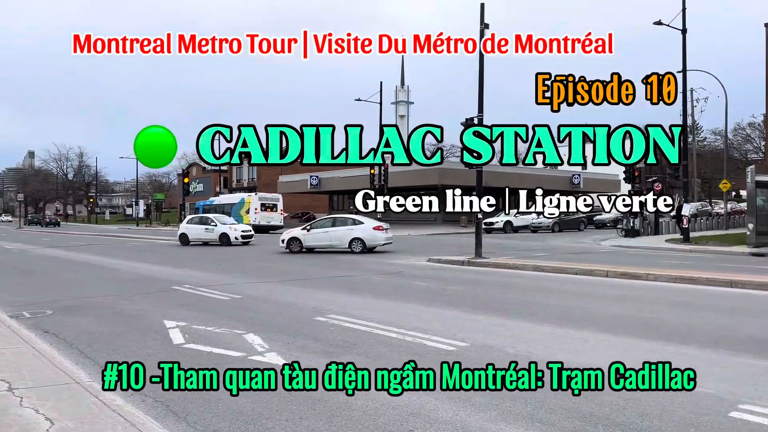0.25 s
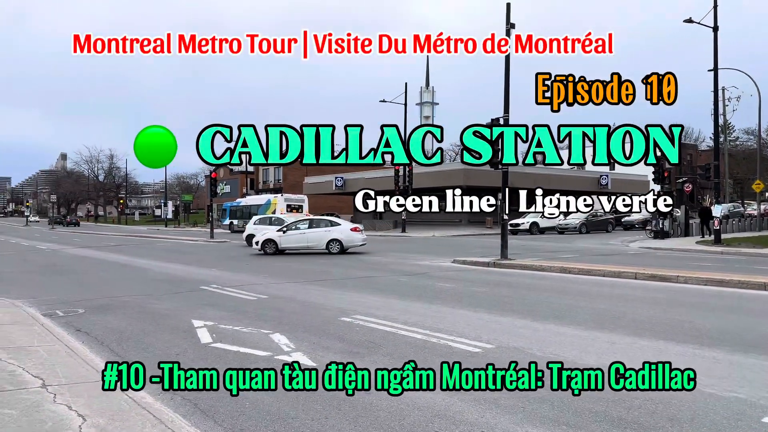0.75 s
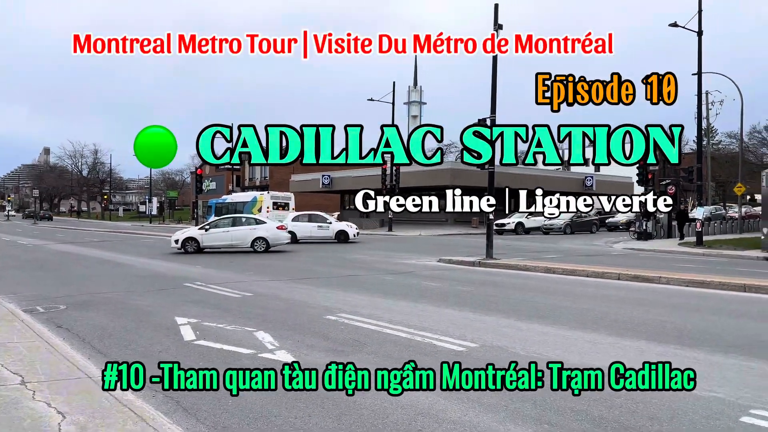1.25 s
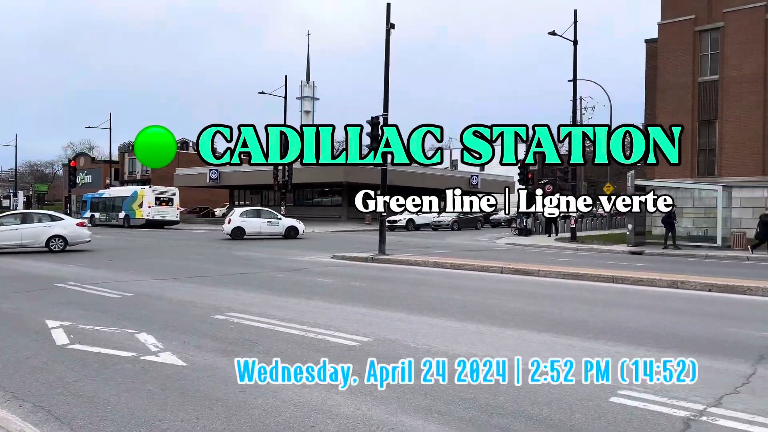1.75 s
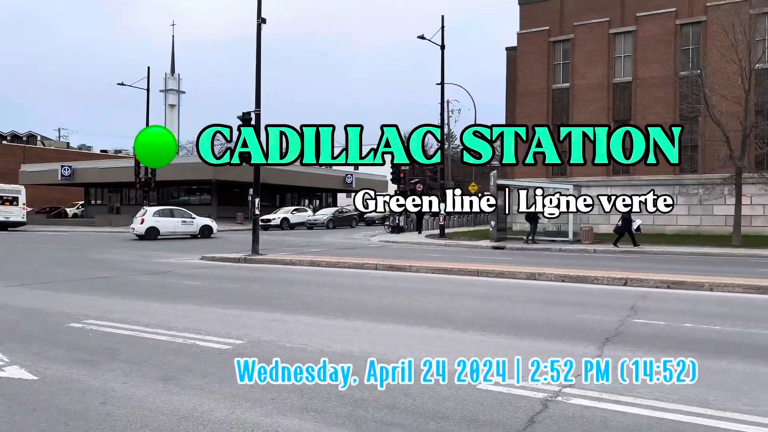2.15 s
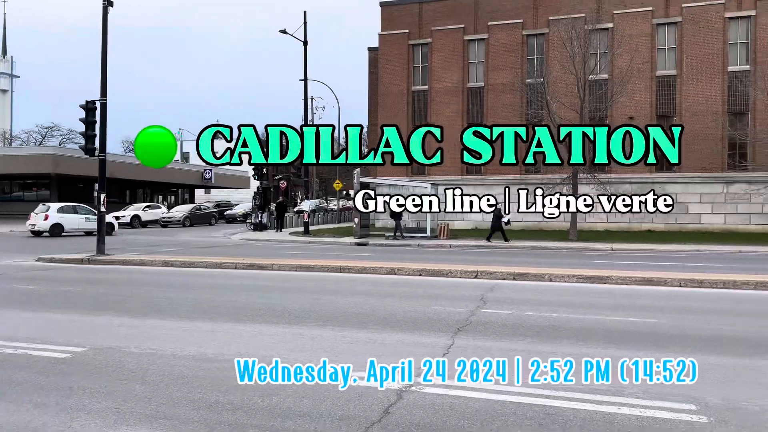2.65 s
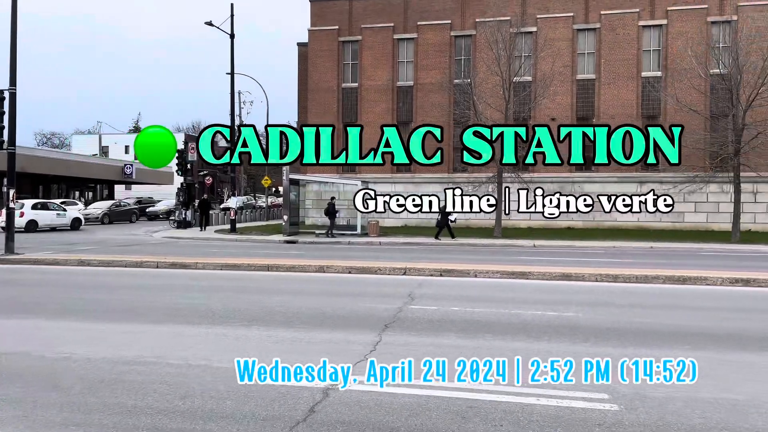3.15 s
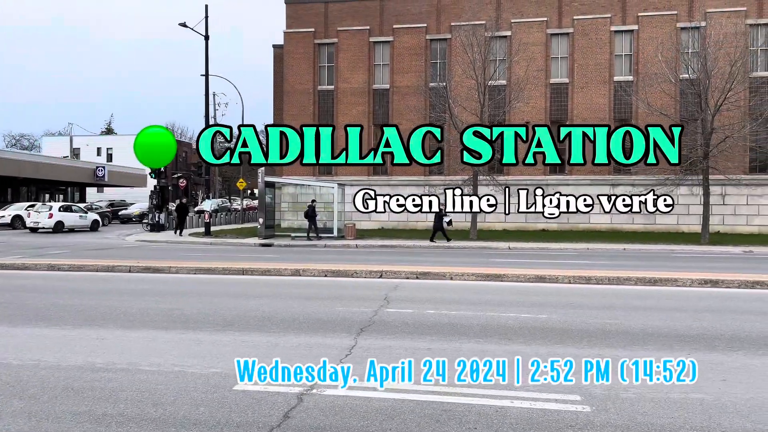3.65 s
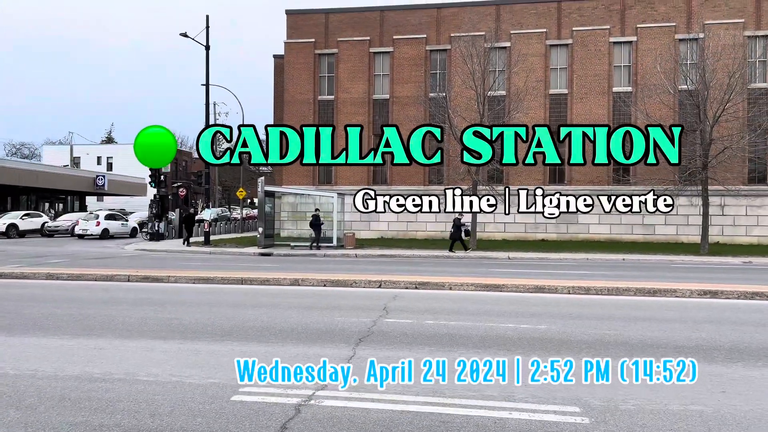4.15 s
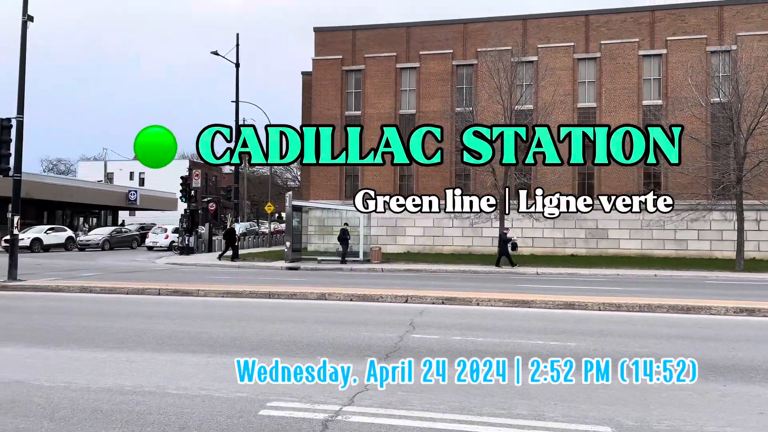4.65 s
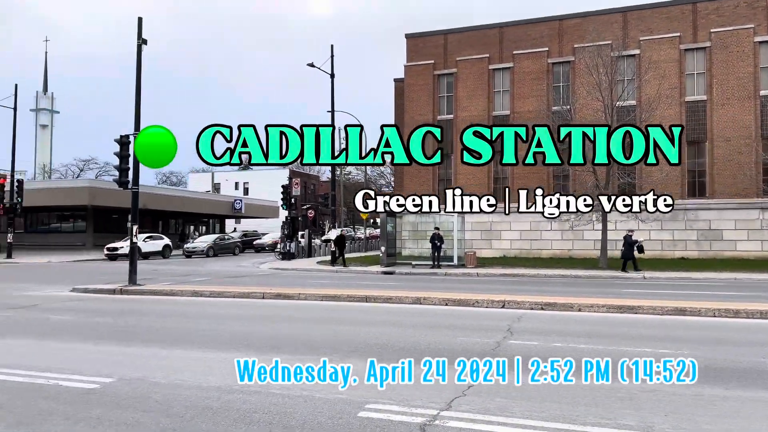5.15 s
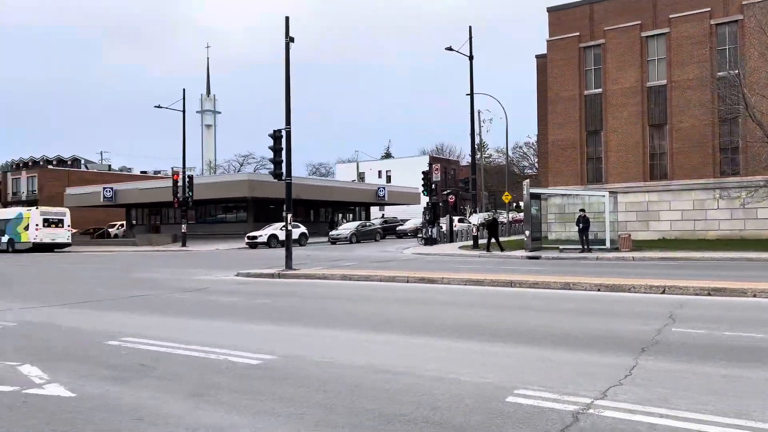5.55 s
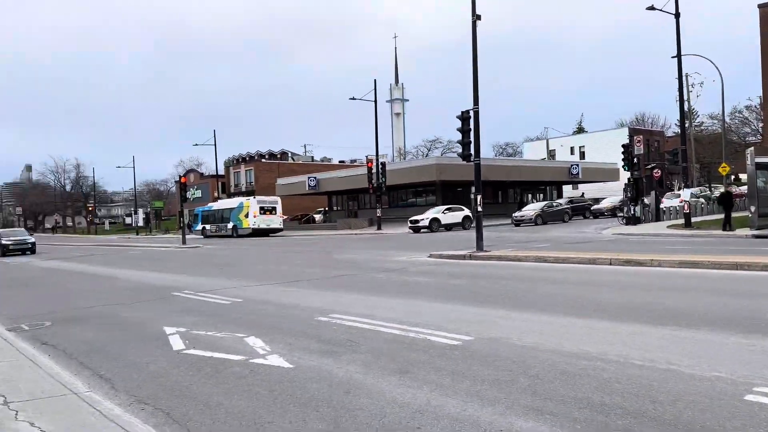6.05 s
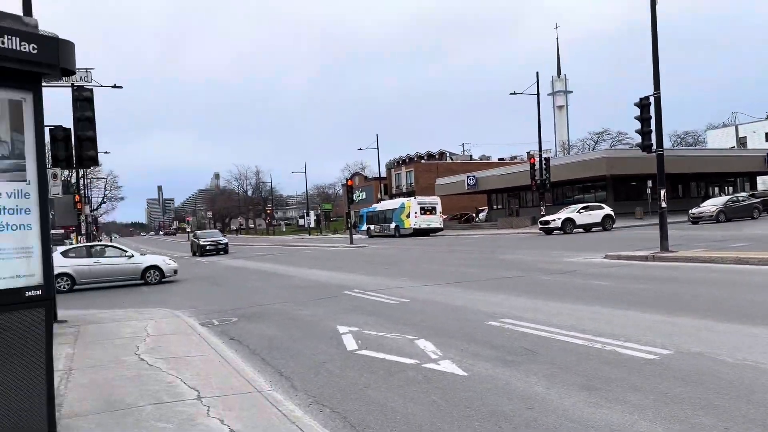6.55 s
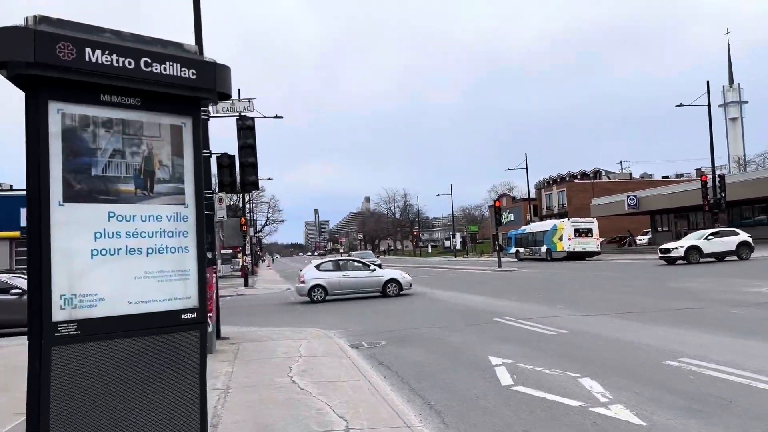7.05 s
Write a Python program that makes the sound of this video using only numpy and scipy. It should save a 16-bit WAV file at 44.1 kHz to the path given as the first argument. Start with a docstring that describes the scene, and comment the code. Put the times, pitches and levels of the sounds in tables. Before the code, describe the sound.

A wide city intersection heard outdoors from the sidewalk, in close stereo. At 0 s a near car is already leaving, its broad tyre roar and airy hiss falling away over engine rumble that is strongest early on. From about 0.5 to 1.3 s, short low wind thumps buffet the microphone; another car leaves near 1.25 s and sharp little clicks land around 1.3 s. From 1.5 s a bus idles as a deep, wavering hum. Distant cars wash past around 2, 2.6, 3.2, 4.2 and 4.9 s, with brief engine booms just after 3 s and sparse faint ticks. Dull knocks with a click come near 5.3 s. From 5.4 s thin brake chirps and very high, faint squeals appear with flickering fizz. Cars turn in near 6.45 s and cross around 7 s, while a fine, rapid rattle swells at 6.9 s and fades by the 7.3 s end.

```python
"""A city intersection heard from the sidewalk through two microphone openings set close together.
Filtered noise makes the avenue's engines and tyres, and the cars that leave, turn in and cross; hiss and fizz lie above.
Wavering sine waves make the idling bus, booming engines, singing treads and thin brake squeals, most of them late.
Short bursts of noise make the early gusts on the microphone, a few ticks, and a fine rattle near the end.
"""
import sys
import numpy as np
from scipy import signal
from scipy.fft import rfft, irfft
from scipy.io import wavfile
from scipy.ndimage import uniform_filter1d

SR = 44100
rng = np.random.default_rng(int(sys.argv[2]) if len(sys.argv) > 2 else 0)


def pcm_store(signal):
    """Save signal as 16-bit PCM."""
    levels = np.round(np.clip(np.atleast_2d(signal), -1, 1) * 32767)
    wavfile.write(sys.argv[1], SR, levels.astype(np.int16).T)


N = 321489  # samples, about 7.3 s

# Noise colours. Each noise is later scaled as a whole, so only the differences in dB count.
# Tyre roar of the avenue: pitch_hz, relative_level_db (per Hz)
AVENUE_ROAR = [(250, 1), (380, -2.5), (500, -1.5), (650, -3), (820, -6), (1020, 2), (1300, -1.5),
               (1780, -16.5), (2100, -13), (2500, -19.5), (3100, -26), (4000, -30), (5500, -31.5),
               (7000, -41), (9000, -42.5), (13000, -100)]
# Brighter rush of the tyre treads: pitch_hz, relative_level_db (per Hz)
TREAD_RUSH = [(900, -30), (1300, 5.5), (1750, 6.5), (2100, -2), (2500, -5.5), (3100, -16), (4500, -59)]
# Engine rumble: pitch_hz, relative_level_db (per Hz)
ENGINE_RUMBLE = [(20, -32.5), (28, -15), (40, -14.5), (55, -7.5), (68, -1.5), (87, -8.5), (114, -5),
                 (165, -8.5), (259, -6.5), (350, -11), (440, -16), (600, -27), (1000, -92)]
# Airy hiss of the near cars: pitch_hz, relative_level_db (per Hz)
CAR_HISS = [(2200, -4), (3300, 3.5), (4200, 3), (5500, 3), (6500, 0.5), (7500, -15), (11000, -79.5)]
# High fizz, also the colour of the rattle: pitch_hz, relative_level_db (per Hz)
FIZZ_COLOUR = [(5500, -16), (7300, -5), (8300, 0), (9400, -2), (10200, -11), (11000, -5), (11600, -4),
               (12300, -26), (16000, -38)]
# Tyre noise of the cars on each route: pitch_hz, relative_level_db (per Hz)
LEAVING_TYRES = [(100, -9.5), (300, 7), (450, 0), (650, -1), (920, 5.5), (1150, 3.5), (1650, -2.5),
                 (2050, -10.5), (2500, -10.5), (3200, -17.5), (4500, -21), (6800, -37), (8300, -27.5),
                 (9400, -41), (10500, -61), (15000, -81)]
TURNING_TYRES = [(100, 2.5), (200, 2.5), (330, -2.5), (600, -0.5), (850, -1), (1200, -4), (1700, -9),
                 (2300, -13), (3200, -20.5), (4500, -25), (7000, -46), (11000, -74.5), (14000, -60)]
CROSSING_TYRES = [(80, 9), (195, 12.5), (300, -2.5), (420, 0.5), (560, 7.5), (730, 0), (950, -0.5),
                  (1250, -3), (1650, -6), (2200, -12), (3200, -17.5), (4500, -24.5), (7000, -36),
                  (9500, -58), (11300, -44), (12500, -62)]

# How the avenue reaches the two ports: pitch_hz, likeness (0 to 1), left_lead_radians, left_minus_right_db
AVENUE_PORTS = [(100, 0.99, -0.0, -0.0), (350, 0.74, -0.8, 0.5), (530, 0.34, -2.4, 3.3),
                (750, 0.68, -3.3, -0.7), (1030, 0.92, -3.1, -1.1), (1350, 0.9, -3.8, -1.5),
                (1800, 0.8, -4.5, -2.6), (2150, 0.82, -5.8, -2.8), (2700, 0.67, -6.2, -1.3),
                (3500, 0.43, -9.5, 0.8), (4300, 0.26, -12.3, 0.7), (6000, 0.14, -12.3, 4.9),
                (9000, 0.28, -12.3, -2.6)]
# Cars far down the avenue: nearest_s, roar_db, fade_s (until the roar is 3 dB down), tread_rush_db
DISTANT_CARS = [(.7, -31.5, 0.64, -40.5), (2.05, -33.5, 0.39, -44.5), (2.62, -41, 0.43, -42),
                (3.15, -37.5, 0.1, -52), (4.249, -37, 0.53, -45.5), (4.85, -39, 0.69, -46),
                (5.28, -38.5, 0.41, -49)]
# Cars at the intersection: nearest_s, roar_db, fade_s (until the roar is 3 dB down), hiss_db, route
CLOSE_CARS = [(.07, -29, 0.206, -51.5, "leaving"), (1.25, -36.5, 0.36, -51.5, "leaving"),
              (3.5, -43, 1.05, -78, "turning"), (6.45, -39, 0.47, -62.5, "turning"),
              (7.05, -34, 0.52, -57, "crossing")]
# Level of the high fizz, before its flutter: time_s, level_db
FIZZ_LEVEL = [(0, -68), (.65, -81), (.88, -78), (1.08, -67.5), (1.55, -70.5), (1.8, -74), (2.1, -79),
              (2.45, -86), (3.4, -77), (3.7, -84), (4.05, -81.5), (5.2, -81), (5.5, -70), (5.95, -67.5),
              (6.62, -67.5), (6.9, -60), (7.29, -64)]
# Idling bus, before its wavering: time_s, firing_rate_hz, level_db
BUS_IDLE = [(1.5, 59.9, -35), (5.13, 59.86, -31.5), (5.45, 61.3, -36.5), (7.2, 59.9, -31.5)]
# Gusts on the microphone: start_s, length_s, level_db, centre_hz
GUST_LIST = [(0.48, 0.066, -16, 76.5), (0.552, 0.043, -21, 62), (0.59, 0.088, -21.5, 64),
             (0.654, 0.056, -23, 62), (0.741, 0.05, -25, 72), (0.793, 0.044, -23.5, 113),
             (.852, 0.047, -17.5, 119), (.975, 0.042, -18.5, 89.5), (1.006, 0.065, -14.5, 83),
             (1.12, 0.126, -28.5, 80.5), (1.148, 0.036, -21, 133), (1.242, 0.046, -18.5, 71),
             (1.287, 0.038, -16.5, 79.5)]
# Small ticks and knocks, with peak levels before panning: start_s, body_db, centre_hz, spread_octaves,
# left_minus_right_db, crack_db, decay_s (the burst dies by a factor e in half this time)
TICK_LIST = [(1.029, -52, 5000, .6, 7, -39, 0.0014), (1.3233, -24, 3200, .17, 6, -33.5, 0.00088),
             (1.3354, -33, 3240, 0.17, 6, -32, 0.0026), (2.329, -44, 5500, .42, 4, -47, 0.0033),
             (3.478, -50, 8500, .4, -2, -56, .002), (3.6195, -36, 6300, 0.068, 4, -52, 0.001),
             (4.1005, -50, 9000, 0.17, 0, -50, .001), (4.1018, -25.5, 1010, 0.59, -10, -53, 0.002),
             (5.022, -45, 5000, .6, 0, -48, 0.0011), (5.29, -18, 333, 0.7, 3, -48, 0.0025),
             (5.3184, -24, 1500, 0.43, -6, -39, 0.0021), (5.323, -25, 1500, 0.31, -3, -31.5, 0.002)]
# Resonances of the metallic crack in every tick: pitch_hz, spread_octaves, relative_level_db
CRACK_MODES = [(1400, .25, 3), (3620, 0.12, 4.5), (5400, 0.15, -1), (8500, 0.078, -3.5),
               (11500, 0.048, -20)]
# Brake squeals and chirps, before a shared lift in level: start_s, length_s, starting_pitch_hz, level_db,
# left_minus_right_db, pitch_jitter_hz
SQUEAL_LIST = [(1.652, .038, 5500, -54, 4, 130), (4.785, .12, 3880, -63, 0, 170),
               (4.79, .05, 5050, -66, 2, 170), (5.408, .025, 4180, -57, 3, 70),
               (5.451, .016, 4380, -51, 3, 70), (5.451, .015, 5880, -63, 4, 50),
               (5.451, .015, 6680, -63, 4, 50), (5.82, .065, 6080, -65, 6, 130),
               (6.235, .04, 5900, -65, 4, 130), (6.10, .24, 9515, -52, 0, 8), (6.32, .13, 9560, -53, 0, 10),
               (6.43, .11, 9470, -64, 0, 30), (6.25, .3, 7190, -74, 0, 30), (6.67, .13, 8385, -63.5, 0, 16),
               (6.81, .22, 8380, -61.5, 0, 16), (7.03, .16, 8400, -66, 0, 18),
               (6.85, .42, 11350, -69, 0, 25)]
# Notes sung by tyre treads: start_s, length_s, pitch_hz, level_db
TREAD_NOTE_LIST = [(2.901, 0.17, 1136, -56), (4.8, 0.13, 970, -55)]
# Engine notes that stand out of the rumble: start_s, length_s, pitch_hz, level_db
DRONE_LIST = [(3.102, 0.16, 269.5, -34.5), (3.15, 0.18, 121.7, -36.5), (3.499, 0.24, 123, -38),
              (4.4, 2, 199.3, -50.5)]
# Peak level of the fine rattle, before its scatter: time_s, level_db
RATTLE_LEVEL = [(6.7, -60), (6.8, -48), (6.92, -40), (7.29, -52)]

RUMBLE_DB, PULL_AWAY_DB, PULL_AWAY_S = -31.5, 4, 1.47  # steady rumble; extra while cars pull away; how long
TREBLE_FALL = 2.1  # hiss falls with distance this many times as steeply as roar, in dB
HISS_REACH = 2.17  # time scale of a car's hiss, as a multiple of its fade time
HISS_FLOOR_DB = -78  # hiss left between cars
SIDE_LAG_MS = 0.416  # delay between the ports for a sound from the side
SQUEAL_RISE_PER_S = 0.025  # share of its pitch that a squeal gains per second
RATTLE_HZ, RATTLE_SCATTER_DB = 31, 2.0  # ticks per second, and how much their strength varies

HOP = 512  # samples between noise frames, each four hops long
HZ = np.fft.rfftfreq(4 * HOP, 1 / SR)
FRAME_S = np.arange(N // HOP + 5)[:, None] * HOP / SR
TIME = np.arange(N) / SR


def gain_of(db):
    """Turns decibels into amplitude."""
    return 10 ** (np.asarray(db) / 20)


def evened(x):
    """Scales a signal to unit rms, its average strength."""
    return x / np.sqrt(np.mean(abs(x) ** 2) + 1e-20)


def along(rows, s):
    """Reads every column of a time curve at the times s."""
    at, *columns = np.transpose(rows)
    return [np.interp(s, at, column) for column in columns]


def across(rows):
    """Reads every column of a spectrum at the frequencies HZ, on a log pitch axis."""
    pitch_hz, *columns = np.transpose(rows)
    return [np.interp(np.log(HZ + 1), np.log(pitch_hz + 1), column) for column in columns]


def sides(balance_db):
    """Gives left and right gains that keep the total power constant."""
    ratio = gain_of(balance_db)
    return np.array([ratio, np.ones_like(balance_db)]) * np.sqrt(2 / (1 + ratio ** 2))


def add(mix, s, sound):
    """Mixes a stereo sound in at time s, cutting it off at the end of the mix."""
    part = mix[:, round(s * SR):][:, :sound.shape[1]]
    part += sound[:, :part.shape[1]]


def waver(rate_hz):
    """Makes a smooth random curve of unit rms that moves mostly slower than the rate."""
    f = np.fft.rfftfreq(N, 1 / SR)
    slow_part = np.exp(-(f / rate_hz) ** 2) * (f > 0)
    return evened(irfft(rfft(rng.standard_normal(N)) * slow_part, N))


def hump(f, centre_hz, octaves):
    """Shapes a bell-shaped band; octaves is its standard deviation."""
    return np.exp(-.5 * (np.log2((f + 1) / centre_hz) / octaves) ** 2)


def wash(spectrum, likeness, balance_db, patchy_db):
    """Stereo noise of unit rms with drifting patches; the complex likeness ties the two ports together."""
    a, b, c, d, patches = rng.standard_normal((5, len(FRAME_S), len(HZ)))
    patches = uniform_filter1d(patches, size=7, axis=0)  # smooth over time
    patches = evened(uniform_filter1d(patches, size=6, axis=1))  # then over frequency
    left = a + 1j * b
    own_share = np.sqrt(np.maximum(1 - abs(likeness) ** 2, 0))
    right = np.conj(likeness) * left + own_share * (c + 1j * d)
    colour = gain_of(across(spectrum)[0] + patchy_db * patches)
    frames = np.array([left, right]) * sides(balance_db + 0 * HZ)[:, None] * colour
    _, noise = signal.istft(frames.swapaxes(1, 2), nperseg=4 * HOP, noverlap=3 * HOP)
    return evened(noise[:, :N])


def passing(s, db, fade_s, fall):
    """Power of a vehicle on a straight lane, nearest at s; fall 1 is the inverse square of its distance."""
    return gain_of(db) ** 2 / (1 + ((TIME - s) / fade_s) ** 2) ** fall


def tone(length, hz, wobble_hz, flutter_db, lead, wobble_rate_hz=73):
    """An unsteady tone of unit rms that swells and fades; the left port leads by some radians."""
    phase = 2 * np.pi * np.cumsum(hz + wobble_hz * waver(wobble_rate_hz)) / SR
    note = np.sin([phase + lead, phase]) * gain_of(flutter_db * waver(35))
    note = note[:, :int(length * SR)]
    return evened(note * signal.windows.tukey(note.shape[1], .4))


def snap(colour, decay_s):
    """A coloured stereo burst of unit peak that rises from zero and quickly dies."""
    t = np.arange(4 * HOP) / SR
    noise = irfft(rfft(rng.standard_normal((2, len(t)))) * colour)
    burst = noise * t * np.exp(-2 * t / decay_s)
    return burst / abs(burst).max()


def avenue():
    """Engines, tyre roar and brighter tread rush are noises that swell as far cars pass, off to the right."""
    same, lead, balance_db = across(AVENUE_PORTS)
    likeness = np.clip(same, 0, 1) * np.exp(1j * lead)
    effort_db = RUMBLE_DB + PULL_AWAY_DB * np.exp(-(TIME / PULL_AWAY_S) ** 2)
    engines = wash(ENGINE_RUMBLE, likeness, balance_db, patchy_db=0.6) * gain_of(effort_db)
    roar_power = sum(passing(s, db, fade_s, 1.0) for s, db, fade_s, _ in DISTANT_CARS)
    rush_power = sum(passing(s, db, fade_s, 1.63) for s, _, fade_s, db in DISTANT_CARS)
    roar = wash(AVENUE_ROAR, likeness, balance_db, patchy_db=2.5) * np.sqrt(roar_power)
    rush = wash(TREAD_RUSH, likeness, balance_db, patchy_db=2.0) * np.sqrt(rush_power)
    return engines + roar + rush


def car(spectrum, route, ahead_s, sweep_s, direct, shade_db, port_gap_ms=0.98):
    """Tyre noise moves from left towards right, straight ahead at ahead_s; echoes are alike only in the bass."""
    khz, share = HZ / 10 ** 3, np.clip(direct, 0, 1)
    lag_ms = SIDE_LAG_MS * np.tanh((FRAME_S - ahead_s) / sweep_s)  # left port's delay behind the right
    straight = share * np.exp(-2j * np.pi * khz * lag_ms)
    echoes = (1 - share) * np.sinc(2 * khz * port_gap_ms)
    balance_db = shade_db * hump(HZ, 870, 0.86)  # negative: weaker on the left
    noise = wash(spectrum, straight + echoes, balance_db, patchy_db=3.0)
    power = sum(passing(s, db, fade_s, 1) for s, db, fade_s, _, way in CLOSE_CARS if way == route)
    return noise * np.sqrt(power)


def hiss(flutter_db=1.6):
    """Each near car brings an airy hiss on the left; above it runs a high, flickering fizz."""
    air_power = gain_of(HISS_FLOOR_DB) ** 2
    for s, _, fade_s, hiss_db, _ in CLOSE_CARS:
        air_power = air_power + passing(s, hiss_db, fade_s * HISS_REACH, TREBLE_FALL)
    air = wash(CAR_HISS, 0.1, 9.2 * hump(HZ, 5100, 0.73), patchy_db=3.5)
    fizz = wash(FIZZ_COLOUR, .6 * np.exp(1.2j), -1, patchy_db=1.5)
    fizz_db = along(FIZZ_LEVEL, TIME)[0] + flutter_db * waver(60)
    return air * np.sqrt(air_power) + fizz * gain_of(fizz_db)


def idling_bus(first_db=-1.5, second_db=-14, third_db=-19):
    """Diesel firing note with two overtones, each wavering on its way over the street."""
    hz, level_db = along(BUS_IDLE, TIME)
    turns = np.cumsum(hz + 0.75 * waver(6.4)) / SR  # firing cycles so far
    note = 0
    for k, db in enumerate([first_db, second_db, third_db], 1):
        strength = gain_of(db + 2.0 * waver(7.4))
        note = note + strength * np.sin(2 * np.pi * (k * turns + rng.random()))
    return np.sqrt(2) * gain_of(level_db) * note


def gusts(octaves=0.39, apart=0.18, lumpiness=0.78, skirt=0.12, skirt_ratio=2.04):
    """Each eddy gives the microphone a short low shove with a weaker flutter above, nearly alike at both ports."""
    out, f = np.zeros((2, N)), np.fft.rfftfreq(SR, 1 / SR)
    for s, length, db, hz in GUST_LIST:
        colour = hump(f, hz, octaves) + skirt * hump(f, hz * skirt_ratio, octaves)
        swirl = signal.hilbert(irfft(rfft(rng.standard_normal((2, SR))) * colour))
        strength = uniform_filter1d(abs(swirl), size=400)
        # lumpiness 1 keeps the natural ups and downs, 0 flattens them
        levelled = swirl.real * strength ** (np.clip(lumpiness, 0, 1) - 1)
        shared, own = levelled[:, :int(length * SR)]
        eddy = np.array([shared + apart * own, shared - apart * own])
        eddy = eddy * signal.windows.tukey(len(own), .4)
        add(out, s, gain_of(db) * evened(eddy))
    return out


def ticks():
    """Small hard contacts: each has a body of its own colour and decay under the same metallic crack."""
    out = np.zeros((2, N))
    metal = sum(gain_of(db) * hump(HZ, hz, octaves) for hz, octaves, db in CRACK_MODES)
    for s, db, hz, octaves, pan_db, crack_db, decay_s in TICK_LIST:
        body = gain_of(db) * snap(hump(HZ, hz, octaves), decay_s)
        crack = gain_of(crack_db) * snap(metal, decay_s)
        add(out, s, sides(pan_db)[:, None] * (body + crack))
    return out


def brakes(level_db=0.5):
    """Brake discs sing in single modes, each a jittery tone creeping up in pitch as the pads press."""
    out = np.zeros((2, N))
    for s, length, hz, db, pan_db, jitter_hz in SQUEAL_LIST:
        pitch = hz * (1 + SQUEAL_RISE_PER_S * TIME)  # time counts from the start of the squeal
        squeal = tone(length, pitch, jitter_hz, flutter_db=3.0, lead=1.8, wobble_rate_hz=400)
        add(out, s, gain_of(db + level_db) * sides(pan_db)[:, None] * squeal)
    return out


def tread_notes():
    """Tyre treads sing briefly in a fuzzy note, far to the right."""
    out = np.zeros((2, N))
    for s, length, hz, db in TREAD_NOTE_LIST:
        add(out, s, gain_of(db) * tone(length, hz, wobble_hz=45, flutter_db=-2.0, lead=-3.0))
    return out


def drones():
    """Engines under load boom through the rumble, each as one slightly wobbling tone."""
    out = np.zeros((2, N))
    for s, length, hz, db in DRONE_LIST:
        add(out, s, gain_of(db) * tone(length, hz, wobble_hz=5.2, flutter_db=0.0, lead=-0.11))
    return out


def rattle(decay_s=.0035):
    """A fine, even ticking in the colour of the fizz, like a coasting freewheel, swells and fades."""
    out = np.zeros((2, N))
    for s in np.arange(RATTLE_LEVEL[0][0], TIME[-1], 1 / RATTLE_HZ):
        db = along(RATTLE_LEVEL, s)[0] + RATTLE_SCATTER_DB * rng.standard_normal()
        add(out, s, gain_of(db) * snap(gain_of(across(FIZZ_COLOUR)[0]), decay_s))
    return out


def scene():
    """Adds up the whole street at the two ports."""
    leaving = car(LEAVING_TYRES, "leaving", ahead_s=-0.19, sweep_s=0.4, direct=0.5, shade_db=-3.5)
    turning = car(TURNING_TYRES, "turning", ahead_s=8.6, sweep_s=0.72, direct=0.56, shade_db=-3.0)
    crossing = car(CROSSING_TYRES, "crossing", ahead_s=6.6, sweep_s=5.7, direct=0.41, shade_db=-2)
    traffic = avenue() + leaving + turning + crossing + hiss() + tread_notes()
    return traffic + idling_bus() + gusts() + ticks() + brakes() + drones() + rattle()


def record(dry):
    """The microphone rolls off the deep bass, then a steep filter removes the highest treble."""
    bass_cut = signal.butter(4, 31, "highpass", fs=SR, output="sos")
    treble_cut = signal.firwin(511, 15700, window=("kaiser", 9), fs=SR)
    thinned = signal.sosfilt(bass_cut, dry)
    return signal.oaconvolve(thinned, treble_cut[None], "same")


dry = scene()
out = record(dry)
pcm_store(out)
```